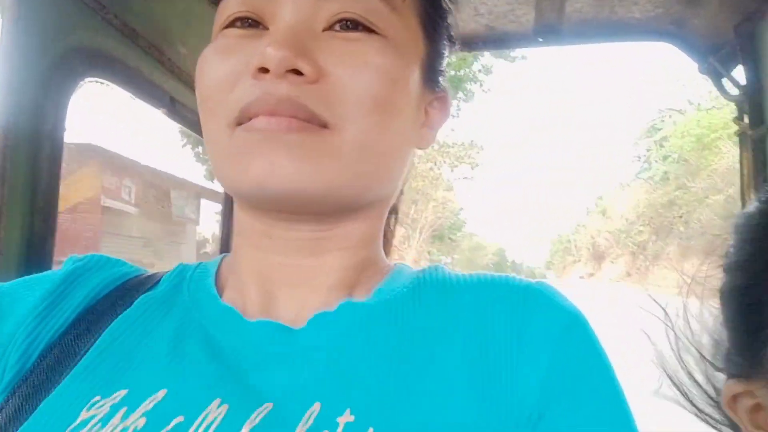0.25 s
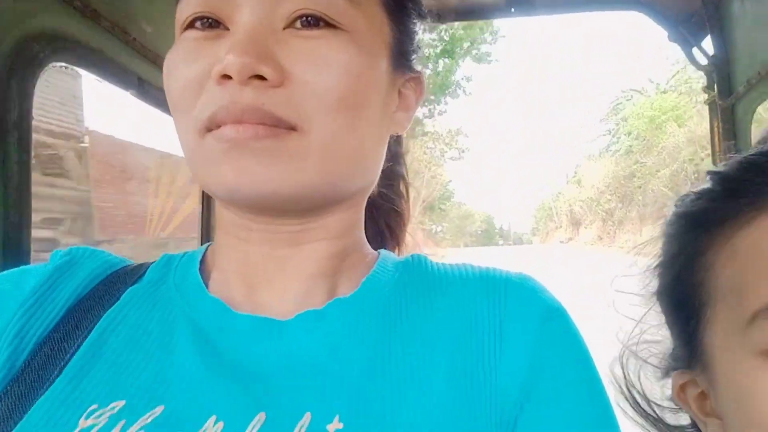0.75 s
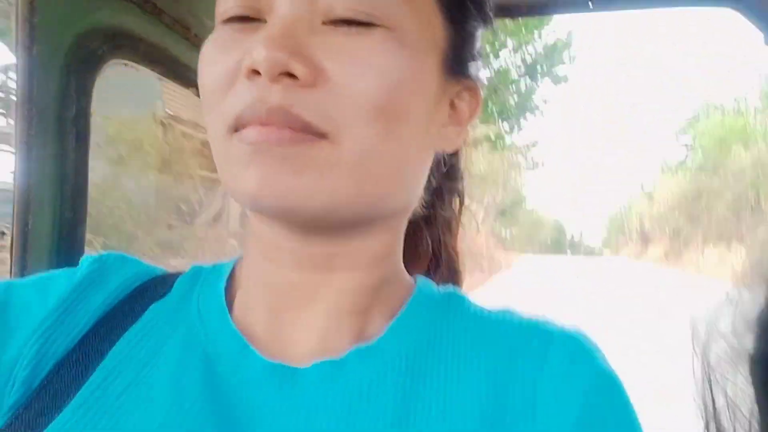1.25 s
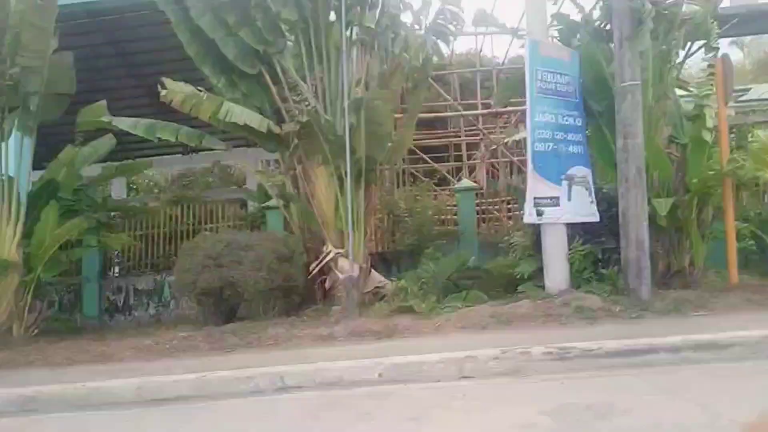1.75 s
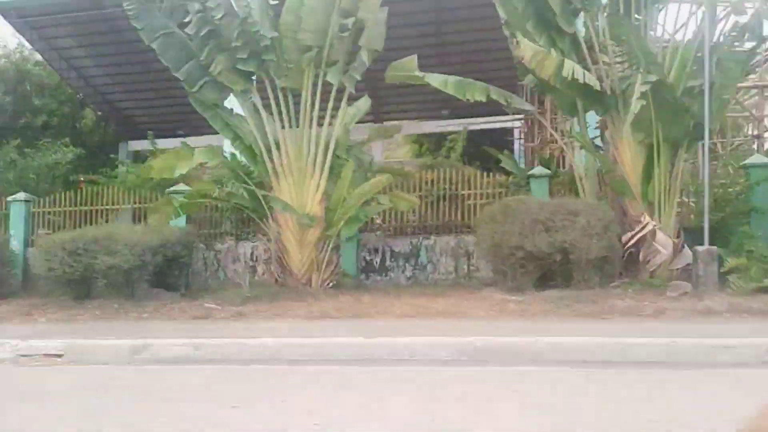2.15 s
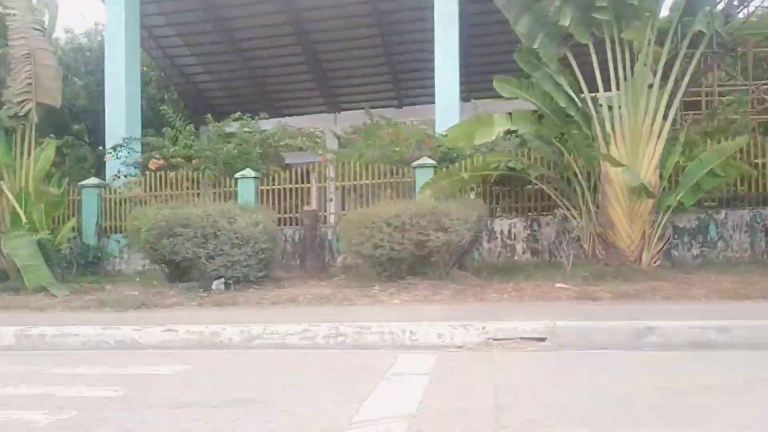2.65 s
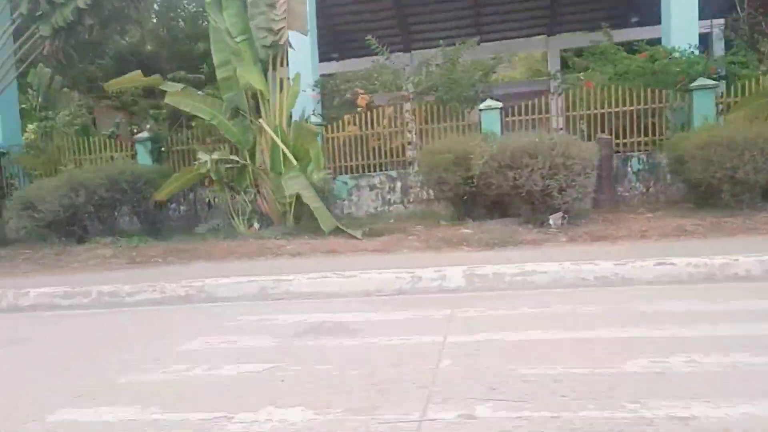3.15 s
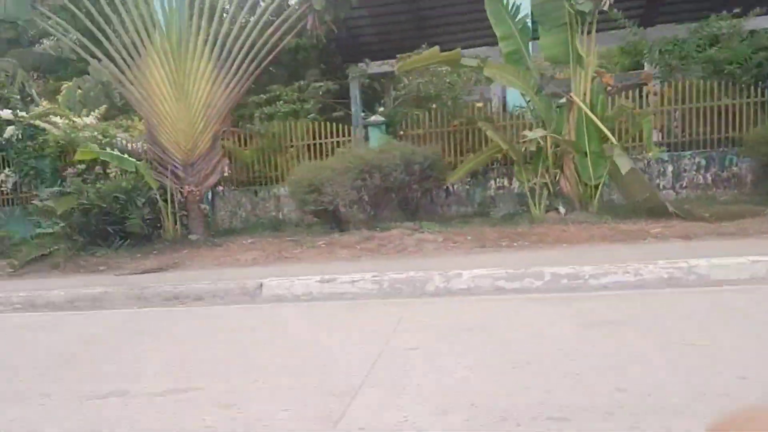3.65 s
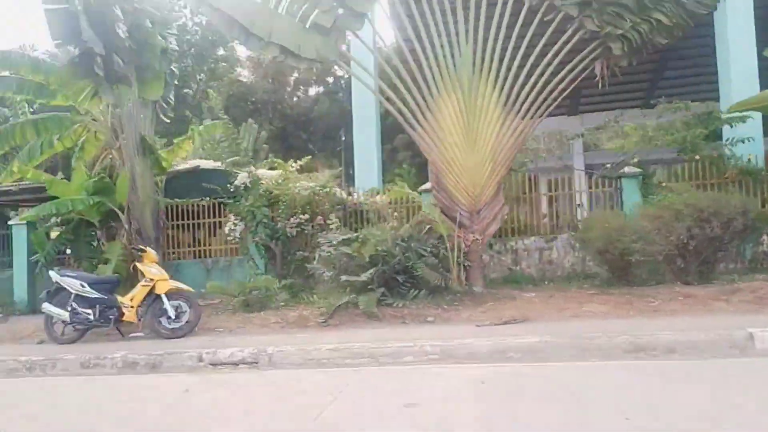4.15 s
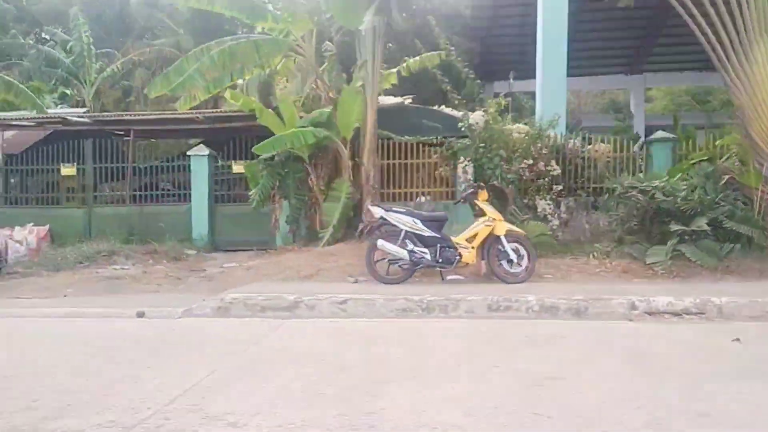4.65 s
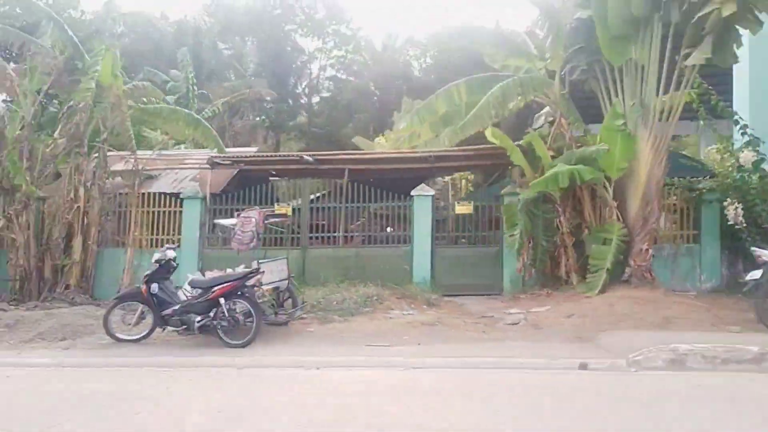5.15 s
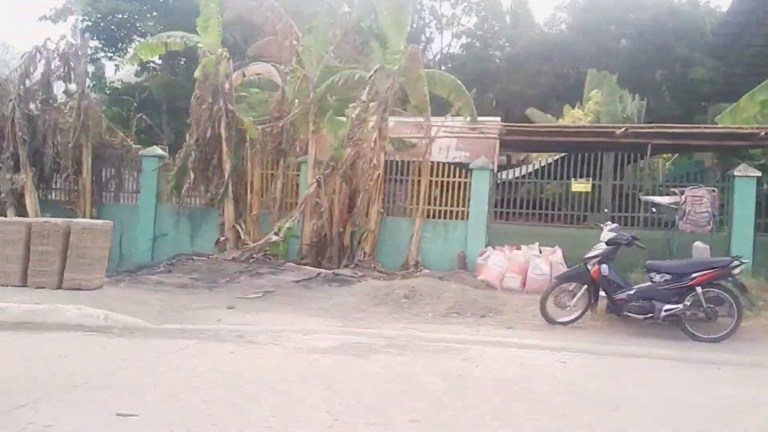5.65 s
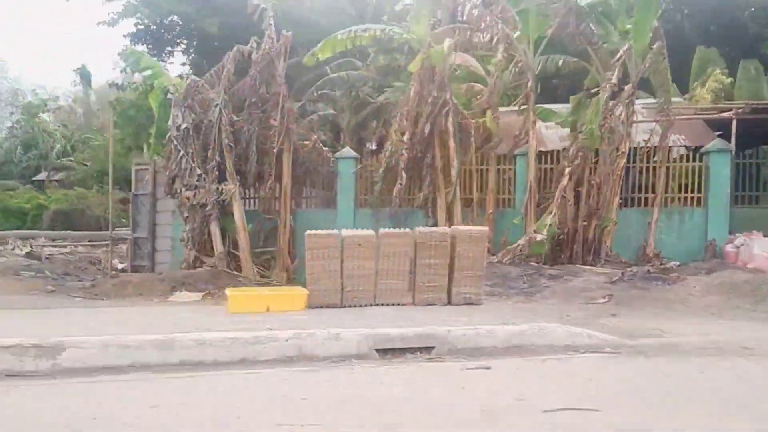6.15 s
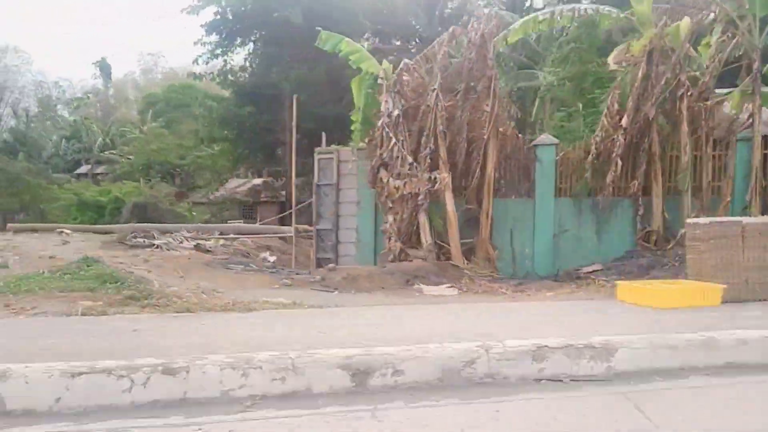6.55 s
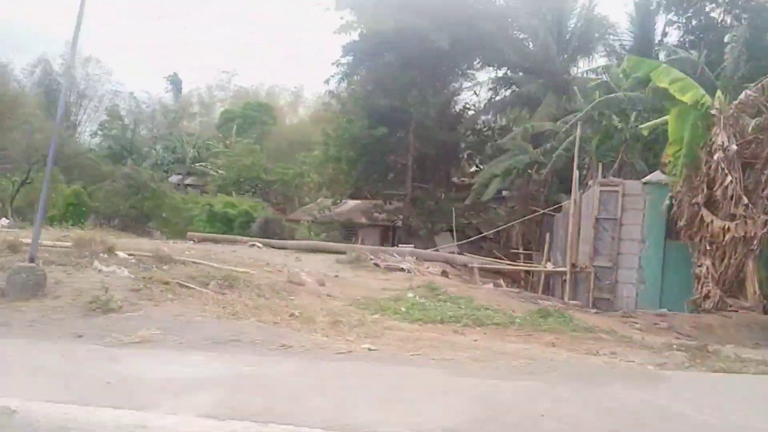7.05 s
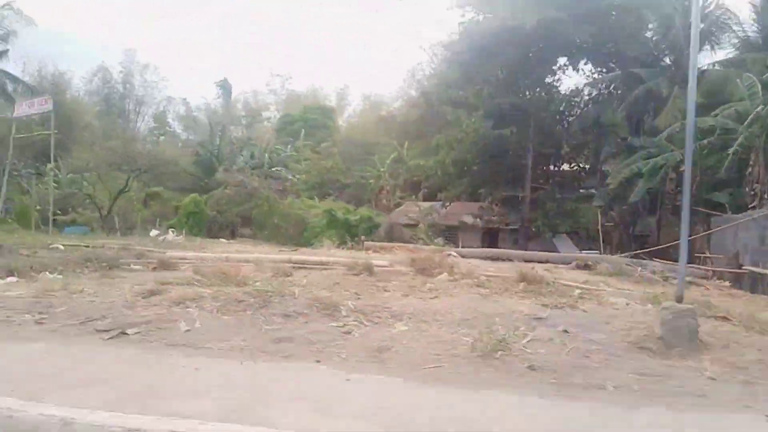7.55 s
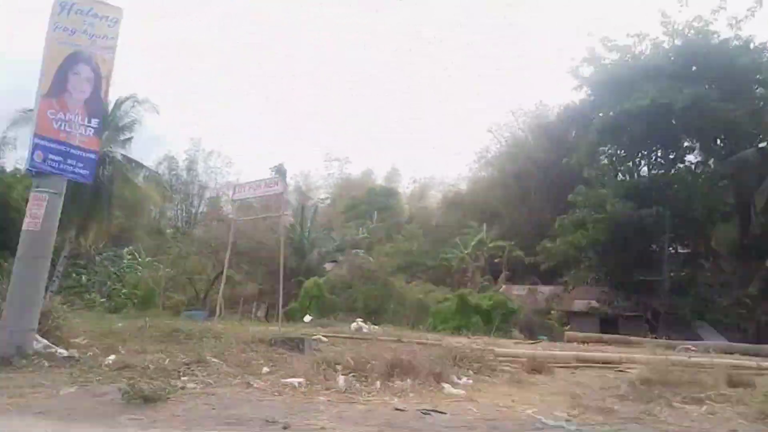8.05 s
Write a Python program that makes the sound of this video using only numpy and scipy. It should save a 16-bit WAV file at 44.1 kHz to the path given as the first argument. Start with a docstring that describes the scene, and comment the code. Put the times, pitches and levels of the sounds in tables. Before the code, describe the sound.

A motor tricycle rides along at an even pace, its engine humming under bright ticking and a hissing chain, heard from the cab. After a brief, abrupt silence the exhaust comes back deeper and more booming, with road roar and gusts of wind slapping the microphone. Faint thin squeaks and a metallic jingle come and go, and the bodywork clatters just before the end.

```python
"""Ride in a motor tricycle's open cab

A single-cylinder four-stroke thuds along at steady speed, each firing ringing the pipe and the cab.
Facing back, valve clatter and chain hiss are bright. After a silent pause, at the open side, the exhaust
booms, the road roars, wind buffets the microphone and loose panels rattle over a bump."""
import sys
import numpy as np
from scipy import signal
from scipy.fft import rfft, irfft
from scipy.io import wavfile
from scipy.ndimage import uniform_filter1d, minimum_filter1d

SR = 44100
rng = np.random.default_rng(int(sys.argv[2]) if len(sys.argv) > 2 else 0)


def file_out(sig):
    """Save sig as 16-bit WAV at sys.argv[1]."""
    # one column per channel
    cols = np.atleast_2d(sig).T
    # limit, then scale
    lim = np.clip(cols, -1, 1)
    pcm = np.round(lim * 32767).astype(np.int16)
    wavfile.write(sys.argv[1], SR, pcm)


N = 366030
T = np.arange(N) / SR

# Low rumble of moving air. Each row: frequency in Hz, relative level in dB.
AIR_RUMBLE = [(8, -14.5), (20, 8.5), (50, 1.5), (90, 2.5), (140, -2.5), (250, -25), (600, -59)]
# Valve bursts at the back and at the side. Each row: place in the cycle (0-1), strength, decay in cycles.
REAR_BURSTS = [(0.052, 1.076, 0.31), (0.368, 0.77, 0.22)]
SIDE_BURSTS = [(.06, 0.31, 0.12), (.42, 0.1, 0.14), (.75, .45, .12)]


def gain_of(db):
    """Decibels as an amplitude factor."""
    return 10 ** (np.asarray(db) / 20)


def unit_rms(x):
    """The signal scaled to an RMS of one."""
    return x / np.sqrt(np.mean(x ** 2) + 1e-20)


def curves(rows):
    """Each column after the first, joined by straight lines in time."""
    times, *columns = np.transpose(rows)
    return [np.interp(T, times, column) for column in columns]


def add(mix, start_s, sound):
    """Mix a sound in at its start time."""
    part = mix[max(round(start_s * SR), 0):][:len(sound)]
    part += sound[:len(part)]


def during(start_s, end_s):
    """A gate with very short fades."""
    return uniform_filter1d(1. * ((T >= start_s) & (T < end_s)), size=40)


def arch(peak_s, length_s):
    """A swell that rises to one and dies away."""
    return np.cos(np.pi * np.clip((T - peak_s) / length_s, -.5, .5))


def noise(spectrum):
    """Unit-level noise shaped by (Hz, dB) points."""
    hz, db = np.transpose(spectrum)
    shape_db = np.interp(np.log(np.fft.rfftfreq(N, 1 / SR) + 1), np.log(hz), db, right=-100)
    return unit_rms(irfft(rfft(rng.standard_normal(N)) * gain_of(shape_db), N))


def wander(rate_hz):
    """Random drift of unit size, mostly slower than the given rate."""
    rolloff = 1 + (np.fft.rfftfreq(N, 1 / SR) / rate_hz) ** 4
    return unit_rms(irfft(rfft(rng.standard_normal(N)) / rolloff, N))


def ring(drive, modes):
    """A drive heard through damped resonances, at unit level."""
    out = np.zeros(N)
    for hz, width, db in modes:
        radius = np.exp(-np.pi * width / SR)
        pole = radius * np.exp(2j * np.pi * hz / SR)
        out += gain_of(db) * signal.lfilter([1 - radius], [1, -pole], drive).imag
    return unit_rms(out)


def engine_cycles(speed, firing_s):
    """Engine cycles counted from one firing; the cylinder fires at each whole number."""
    cycles = np.cumsum(curves(speed)[0]) / SR
    return cycles - np.interp(firing_s, T, cycles)


def per_cycle(cycles, spread_db):
    """A new random strength for every engine cycle."""
    chance = np.sqrt(3) * rng.uniform(-1.1, 1, size=512)
    return gain_of(spread_db * chance)[np.floor(cycles).astype(int) % len(chance)]


def strikes(cycles, uneven_db):
    """One click at the start of every engine cycle."""
    return np.diff(np.floor(cycles), prepend=np.floor(cycles[0])) * per_cycle(cycles, uneven_db)


def wind():
    """Gusts over a breeze: lumpy rumble and flutter, with slaps as strong eddies hit the microphone."""
    # Flutter above the rumble. Each row: frequency in Hz, relative level in dB.
    flutter_spectrum = [(70, -17), (140, 8), (210, 2.5), (330, -2.5), (450, -5.5), (700, -13), (1500, -24)]
    # Each row: peak time and length in seconds, relative rumble and flutter levels in dB.
    gusts = [(2.72, .35, -28, -32), (2.853, 0.29, -26, -19), (3.1, .45, -24.5, -25.5),
             (3.528, 0.13, -26, -21), (3.802, 0.81, -27, -24), (4.022, 0.17, -33, -22.5),
             (4.4, 1, -29.5, -25.5), (5.004, 0.092, -34, -25), (5.61, 0.32, -23, -30),
             (6.21, 0.17, -29, -20.5), (6.384, 0.75, -24, -22), (6.59, .12, -22, -17.5),
             (6.74, .12, -24, -20.5), (7.45, 0.41, -42, -38), (7.784, 0.24, -28, -33),
             (7.96, .18, -19, -24)]
    # Each row: start in seconds, level in dB, pitch in Hz.
    slaps = [(2.789, -4.5, 290), (2.857, -5, 343), (3.67, 0, 203), (3.762, -6, 220), (3.878, 1.5, 294),
             (3.994, -5.5, 275), (4.617, 1, 294), (6.237, -.5, 260), (7.926, -8, 197)]
    rumble = gain_of(-36 + 1.6 * wander(3.8))
    flutter = gain_of(-29.5 + 2.8 * wander(14))  # small eddies in the breeze
    for peak_s, length_s, rumble_db, flutter_db in gusts:
        swell = arch(peak_s, length_s)
        rumble = np.hypot(rumble, gain_of(rumble_db) * swell)
        flutter = np.hypot(flutter, gain_of(flutter_db) * swell)
    air = gain_of(1.2) * rumble * noise(AIR_RUMBLE)
    air += flutter * noise(flutter_spectrum) * unit_rms(gain_of(0.98 * wander(45)))
    t = T[:SR // 20]
    rise = t / 0.0008
    for start_s, db, hz in slaps:
        add(air, start_s, -gain_of(db) * rise * np.exp(1 - rise) * np.sin(2 * np.pi * hz * t))
    return air


def bodywork():
    """Loose panels chatter on a bump; thin, dry metal squeaks now and then."""
    # Each row: start in seconds, relative level in dB, decay in seconds.
    rattles = [(7.72, -19.5, 0.017), (7.772, -24, 0.011), (7.988, -22.5, 0.072), (8.028, -36, 0.0016),
               (8.045, -23, 0.0011), (8.07, -20.5, 0.026), (8.126, -34, 0.0019), (8.236, -28.5, 0.0092)]
    # Each row: start in seconds, level in dB, pitch in Hz, length in seconds.
    squeaks = [(1.1, -16.5, 12950, 0.018), (1.138, -20, 13000, 0.022), (2.26, -37, 10800, .018),
               (3.272, -39, 10050, .03), (4.382, -36, 7230, .02), (4.421, -37, 7150, .022),
               (4.525, -35, 7240, 0.027), (5.085, -37, 6860, 0.018), (5.192, -36, 7100, .014)]
    envelope, t = np.zeros(N), T[:SR // 5]
    chatter = noise([(400, -18), (1200, 14.5), (2500, 14.5), (5000, 5.5),
                     (8000, 1), (12000, 0), (16000, -3)])
    for start_s, db, decay_s in rattles:
        add(envelope, start_s, gain_of(db) * (np.exp(-t / decay_s) - np.exp(-t / (0.047 * decay_s))))
    out = envelope * chatter * unit_rms(gain_of(0.77 * wander(330)))
    for start_s, db, hz, length_s in squeaks:
        swell = np.sin(np.pi * np.minimum(t / length_s, 1))
        pitch = hz + 110 * wander(200)[:len(t)]
        add(out, start_s, gain_of(db) * swell * np.sin(2 * np.pi * np.cumsum(pitch) / SR))
    return out


def loose_metal(cycles, place, uneven_db, contact_s):
    """Once a cycle a loose metal part jingles against the frame."""
    # Each row: frequency in Hz, bandwidth in Hz, relative level in dB.
    modes = [(2960, 90, -7), (3437, 36, 0), (4000, 120, -11), (7150, 200, -14)]
    pressure = signal.lfilter([1], [1, -np.exp(-1 / (contact_s * SR))], strikes(cycles - place, uneven_db))
    return ring(pressure * rng.standard_normal(N), modes)


def cab_drone(cycles, waver_db):
    """Cab panels hum at harmonics of the firing rate, each swelling and fading by itself."""
    # Each row: multiple of the firing rate, relative level in dB.
    harmonics = [(12, 4), (13, -1), (14, -1.5), (16, -6.5), (17, -4.5), (18, -8.5), (20, -7), (23, -8.5),
                 (24, -1), (25, -7), (35, -9), (46, -7), (50, -15)]
    crank = cycles + 0.0053 * wander(4.1)  # the crank never turns quite evenly
    hum = np.zeros(N)
    for order, db in harmonics:
        hum += gain_of(db + waver_db * wander(1.8)) * np.sin(2 * np.pi * (order * crank + rng.random()))
    return unit_rms(hum)


def frame_knock(cycles, spectrum, decay_s):
    """Every firing sets off the same dense, dying ring of the frame."""
    frame = (noise(spectrum) * np.exp(-T / decay_s))[:SR // 10]
    return unit_rms(signal.oaconvolve(strikes(cycles, uneven_db=6.5), frame)[:N])


def road_and_cab(cycles):
    """Tyre roar pulsing with the engine, over the cab's hum and the frame's knock."""
    # Colour of both roar and knock. Each row: frequency in Hz, relative level in dB.
    spectrum = [(200, -27), (450, -4.5), (660, 3.5), (820, 2), (1000, 3.5), (1450, 1), (1560, -4),
                (2000, -5.5), (3000, -18.5), (6000, -26.5)]
    roar = gain_of(-1) * noise(spectrum)
    roar *= valve_beat(cycles, SIDE_BURSTS, depth=0.24, uneven_db=8, grit_db=0.06)
    hum = gain_of(-5) * cab_drone(cycles, waver_db=1.5)
    return roar + hum + gain_of(-12.5) * frame_knock(cycles, spectrum, decay_s=0.064)


def chain_pull(tight_s, wheel_hz):
    """The chain tightens once per wheel turn, from -1 (slack) to 1 (tight)."""
    return np.cos(2 * np.pi * wheel_hz * (T - tight_s))


def rear_chain(cycles):
    """The chain hisses in time with the engine, and its thin plates ring."""
    # Each row: frequency in Hz, relative level in dB.
    spectrum = [(6000, -39), (9500, -14.5), (11200, -7.5), (12200, -2.5), (13400, 4), (15200, -4),
                (16000, 10.5)]
    # Each row: frequency in Hz, bandwidth in Hz, relative level in dB.
    plate_modes = [(10400, 90, -14), (12995, 60, 0), (13780, 130, -6), (14400, 85, -6), (15150, 160, -5)]
    links = valve_beat(cycles, REAR_BURSTS, depth=1.8, uneven_db=3, grit_db=0)
    plates = ring(links * rng.standard_normal(N), plate_modes)
    return links * noise(spectrum) + gain_of(-11.5) * plates


def side_chain(cycles):
    """From the side the chain is a plain hiss, pulsing with the engine."""
    # Each row: frequency in Hz, relative level in dB.
    spectrum = [(6000, -19), (9500, -12.5), (11500, -9), (13000, -3.5), (14500, -0.5), (16000, 1)]
    return noise(spectrum) * valve_beat(cycles, SIDE_BURSTS, depth=0.71, uneven_db=9.5, grit_db=0.8)


def valve_beat(cycles, bursts, depth, uneven_db, grit_db):
    """Envelope of mechanical noise: sudden gritty bursts at set crank angles over a steady floor."""
    pulses = sum(strength * per_cycle(cycles - place, uneven_db) * np.exp(-((cycles - place) % 1) / decay)
                 for place, strength, decay in bursts)
    return unit_rms((1 + depth * pulses) * gain_of(grit_db * wander(170)))


def valve_clatter(beat, spectrum, modes, noise_db, metal_db):
    """The valve gear ticks out bursts of noise and rings the engine's metal."""
    metal = ring(beat * rng.standard_normal(N), modes)
    return gain_of(noise_db) * beat * noise(spectrum) + gain_of(metal_db) * metal


def exhaust_bark(cycles, uneven_db):
    """The rounded front of each exhaust pulse rings the pipe and the cab."""
    # Each row: frequency in Hz, bandwidth in Hz, relative level in dB.
    pipe_modes = [(333, 56, -2), (431, 39, -18.5), (545, 18, -9.5), (640, 41, -6.5), (953, 23, 1.5),
                  (1387, 90, -13.5)]
    front = np.hanning(SR // 1500)
    return ring(-np.convolve(strikes(cycles, uneven_db), front, "same"), pipe_modes)


def exhaust_boom(cycles, harmonics, uneven_db):
    """Low harmonics line up into one thud a sixth of a cycle after each firing."""
    thuds = -sum(gain_of(db) * np.cos(2 * np.pi * order * (cycles - 1 / 6)) for order, db in harmonics)
    return unit_rms(thuds) * gain_of(uneven_db * wander(20))


def facing_back():
    """A droning exhaust under bright clatter and chain hiss that swell with each wheel turn."""
    # Each row: time in seconds, firings per second.
    speed = [(0.0, 27.7), (0.333, 27.77), (0.665, 27.57), (0.998, 27.51), (1.33, 26.81)]
    # Exhaust tone. Each row: multiple of the firing rate, relative level in dB.
    harmonics = [(1, -20), (2, -16), (3, -18), (4, -20), (5, -0.5), (6, -17.5), (7, -27), (8, -18),
                 (10, -15.5)]
    # Engine metal. Each row: frequency in Hz, bandwidth in Hz, relative level in dB.
    metal_modes = [(715, 50, -10), (1480, 50, -8), (1755, 90, -3), (2095, 90, -7), (2365, 45, -4),
                   (2460, 50, 0), (2670, 60, -9), (4735, 30, -16), (5290, 35, -14), (9645, 30, -15)]
    # Noise colours. Each row: frequency in Hz, relative level in dB.
    clatter_spectrum = [(500, -20), (1100, -9.5), (1500, -2.5), (2400, 1), (3000, -2), (3700, -7.5),
                        (4400, -15.5), (5800, -16.5), (7400, -9), (8100, -12.5), (8800, -21),
                        (11000, -23.5), (16000, -34)]
    road_spectrum = [(60, -16.5), (120, -0.5), (190, -4), (300, -12), (400, -17), (700, -17.5),
                     (1100, -14.5), (2000, -33.5), (5000, -46)]
    cycles = engine_cycles(speed, firing_s=0)
    pull = chain_pull(tight_s=.128, wheel_hz=5.2)
    boom = gain_of(-25) * exhaust_boom(cycles, harmonics, uneven_db=1.2)
    bark = gain_of(-41) * exhaust_bark(cycles, uneven_db=-1.5)
    beat = valve_beat(cycles, REAR_BURSTS, depth=0.62, uneven_db=-5, grit_db=0.5)
    clatter = valve_clatter(beat, clatter_spectrum, metal_modes, noise_db=-0.5, metal_db=-2.5)
    clatter *= gain_of(-24.5 + .9 * pull)
    chain = gain_of(-27 + 1.6 * pull) * rear_chain(cycles)
    road = noise(road_spectrum) * gain_of(-29 + 1.3 * wander(25.64))
    return boom + bark + clatter + chain + road + gain_of(-27.5) * noise(AIR_RUMBLE)


def open_side():
    """Separate exhaust thuds, road roar and duller clatter, swaying with the wheel, shaken by jolts."""
    # Each row: time in seconds, firings per second.
    speed = [(2.017, 27.88), (2.41, 27.2), (2.802, 27.75), (3.195, 27.17), (3.588, 27.42), (3.98, 27.28),
             (4.373, 27.41), (4.766, 27.21), (5.159, 27.28), (5.551, 27.02), (5.944, 27.27), (6.337, 27.13),
             (6.729, 27.15), (7.122, 27.19), (7.515, 27.09), (7.907, 27.07), (8.3, 27.07)]
    # Exhaust tone. Each row: multiple of the firing rate, relative level in dB.
    harmonics = [(1, -42), (2, -17), (3, -58), (4, -2.5), (5, 0), (6, -3), (7, -18.5), (8, -14)]
    # Engine metal. Each row: frequency in Hz, bandwidth in Hz, relative level in dB.
    metal_modes = [(1898, 20, 7.5), (2012, 43, 4), (2383, 30, 2), (2896, 210, -5.5)]
    # Each row: frequency in Hz, relative level in dB.
    clatter_spectrum = [(800, -24), (1700, 6), (2300, 4.5), (2900, 2), (3600, 0), (4600, -8.5),
                        (6200, -7.5), (7200, -5.5), (8200, -3), (8900, -13), (11000, -16.5), (16000, -28)]
    # Each row: time in seconds, then base levels in dB of boom, road, clatter and chain.
    faders = [(2.02, -20.5, -28.5, -36.0, -36), (2.6, -19, -28, -34.5, -34.5), (2.85, -24, -29, -36.0, -36),
              (3.1, -15.5, -27, -33.5, -34), (3.8, -20.5, -28.5, -35, -36), (4.95, -17.5, -26, -33, -33.5),
              (5.35, -19.0, -27.0, -34.5, -34), (6.85, -18.5, -27, -32.5, -34),
              (7.05, -18.5, -27.5, -32, -36.5), (7.45, -21.0, -28.5, -31.5, -38.5),
              (7.62, -17.5, -25, -29.5, -32), (8.14, -25.5, -31.5, -35.5, -42),
              (8.25, -17, -26, -29.5, -32.5)]
    # Jolts from the road. Each row: peak time and length in seconds, lift of the jingle in dB.
    jolts = [(2.622, 0.13, 4), (4.522, 0.063, 11.5), (4.96, 0.12, 8.5), (5.556, 0.071, 8.5),
             (5.79, 0.31, 5.5), (5.99, 0.22, 4.5), (6.56, 0.12, 5), (6.88, 0.26, 1), (7.25, 0.22, 9.5)]
    cycles = engine_cycles(speed, firing_s=2.029)
    boom_db, road_db, clatter_db, chain_db = curves(faders)
    sway = chain_pull(tight_s=2.065, wheel_hz=3.775) + 0.73 * wander(8.1)
    jolt_db = sum(db * arch(peak_s, length_s) for peak_s, length_s, db in jolts)
    boom = gain_of(boom_db + 0.2 + 0.47 * sway) * exhaust_boom(cycles, harmonics, uneven_db=0.74)
    beat = valve_beat(cycles, SIDE_BURSTS, depth=0.43, uneven_db=9, grit_db=-1.3)
    road = road_and_cab(cycles)
    scattered = cycles + .0036 * wander(10)  # exhaust pulses stray from the steady beat
    bark = gain_of(-5) * exhaust_bark(scattered, uneven_db=3.5)
    body = gain_of(road_db + 0.64 * sway + .15 * jolt_db) * (road + bark)
    clatter = valve_clatter(beat, clatter_spectrum, metal_modes, noise_db=-2.1, metal_db=-3.5)
    clatter *= gain_of(clatter_db + 0.52 * sway + 0.29 * jolt_db)
    looseness_db = -17.5 + 0.75 * T  # the metal part works looser as the ride goes on
    jingle = loose_metal(cycles, place=.76, uneven_db=4, contact_s=.003)
    jingle *= gain_of(clatter_db + looseness_db + jolt_db)
    chain = gain_of(chain_db - .5 + 1.1 * sway + 0.2 * jolt_db) * side_chain(cycles)
    return boom + body + clatter + jingle + chain


def overshoot_db(x, threshold_db, hold_s, release_db_per_s):
    """How far peaks pass a threshold, held for a moment and then let go."""
    over_db = np.maximum(20 * np.log10(abs(x) + 1e-9) - threshold_db, 0)
    half_hold = round(hold_s * SR / 2)
    held_db = -minimum_filter1d(-over_db, size=2 * half_hold + 61, origin=half_hold)
    fall_db = T * release_db_per_s
    return uniform_filter1d(np.maximum.accumulate(held_db + fall_db) - fall_db, size=60)


def scene():
    """Two stretches of the ride with a silence between them, in mono."""
    rear = facing_back() * during(0, 1.314)
    side = (open_side() + wind()) * during(2.017, 8.31)
    return (rear + side + bodywork())[None]


def record(dry):
    """Hard slaps duck the whole ride, a quick limiter holds other peaks, a low-pass trims the top."""
    duck_db = 1.17 * overshoot_db(dry[0], threshold_db=-4, hold_s=.055, release_db_per_s=77)
    ducked = dry / gain_of(duck_db)
    limit_db = overshoot_db(ducked[0], threshold_db=-6.2, hold_s=.002, release_db_per_s=140)
    limited = ducked / gain_of(limit_db)
    lowpass = signal.firwin(1023, 15750, window=("kaiser", 9), fs=SR)
    return signal.oaconvolve(limited, lowpass[None], "same")


dry = scene()
out = record(dry)
file_out(out)
```